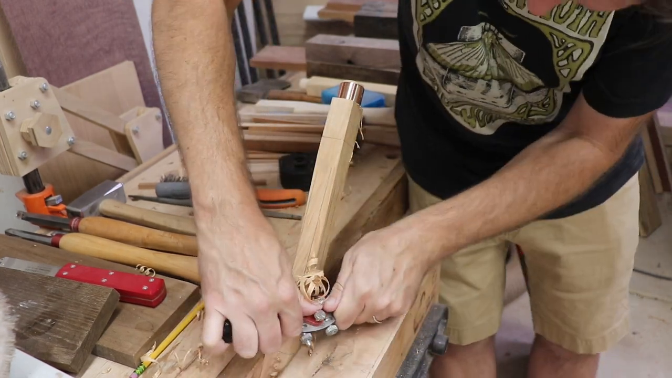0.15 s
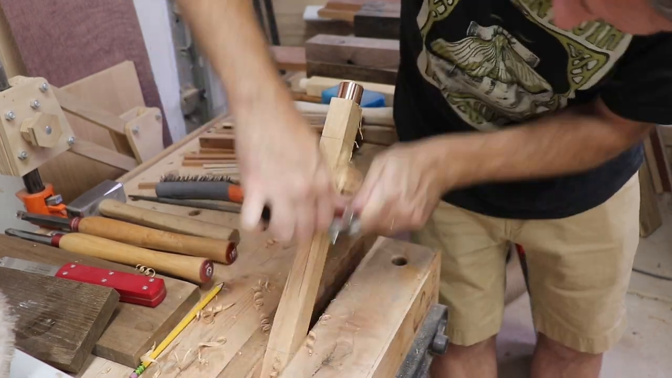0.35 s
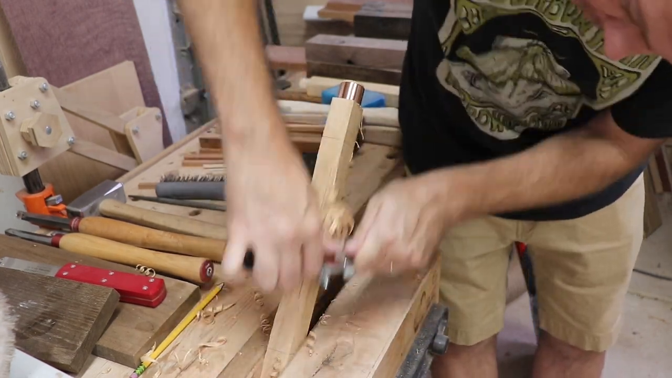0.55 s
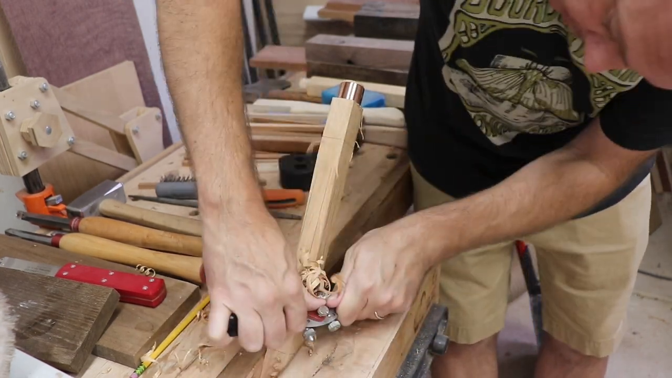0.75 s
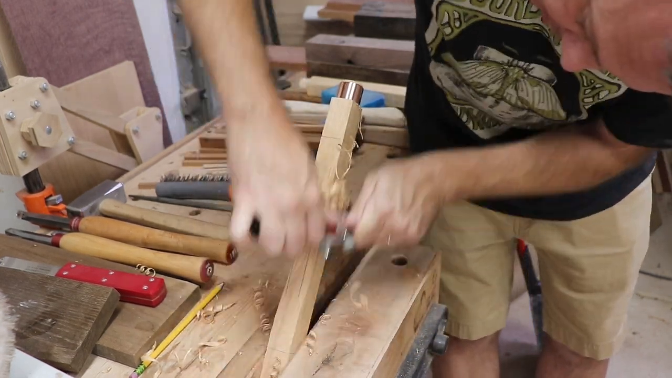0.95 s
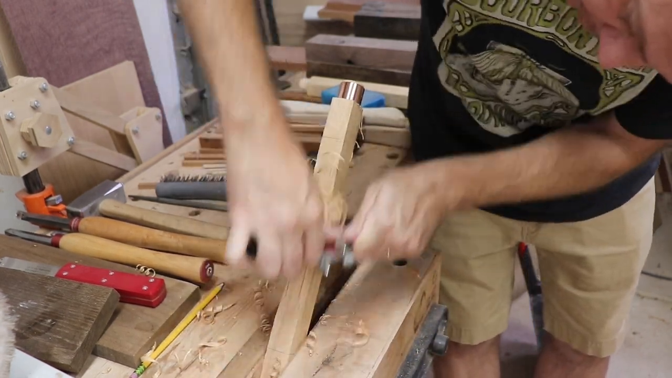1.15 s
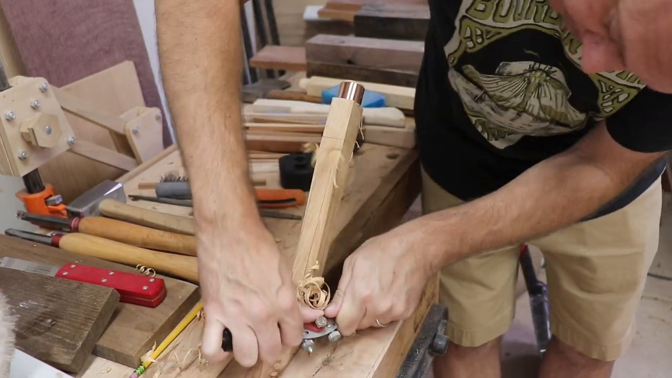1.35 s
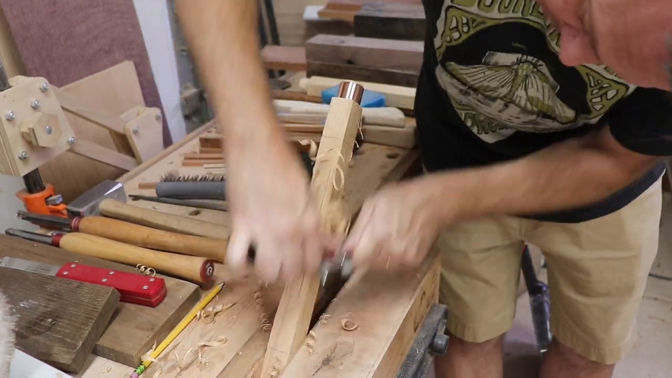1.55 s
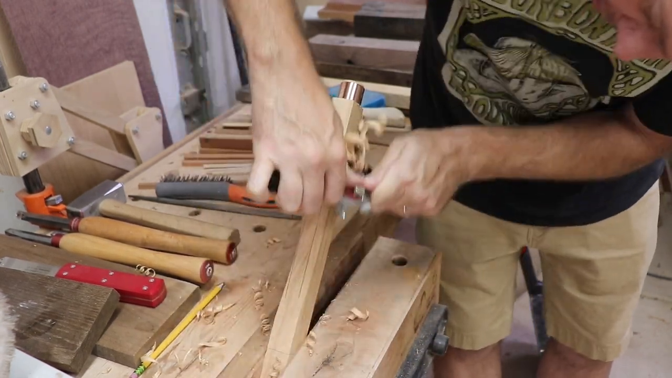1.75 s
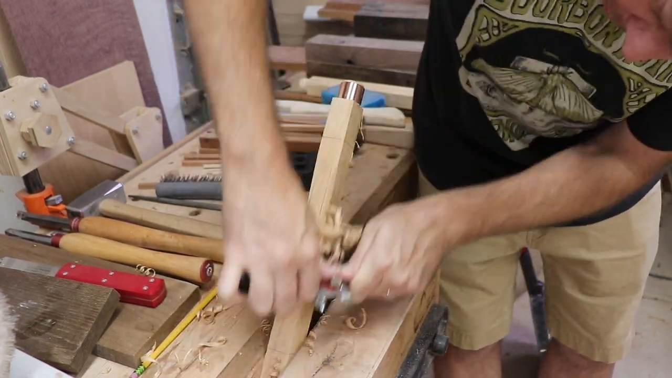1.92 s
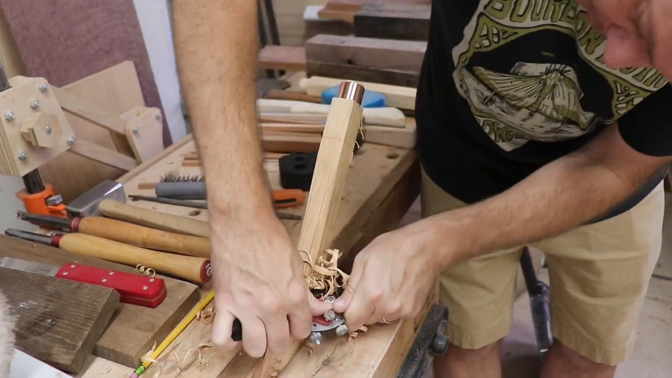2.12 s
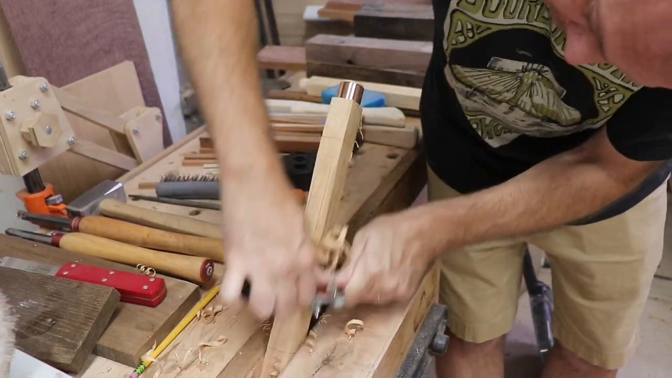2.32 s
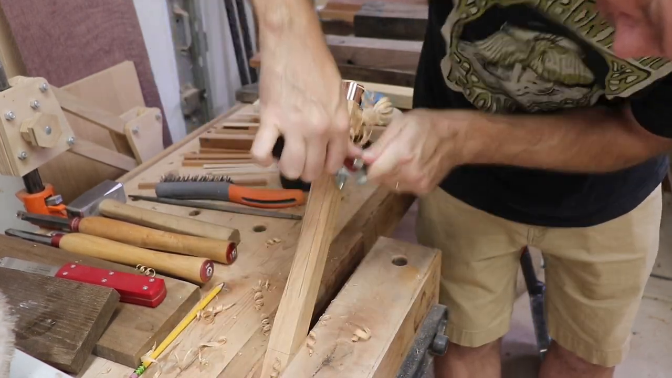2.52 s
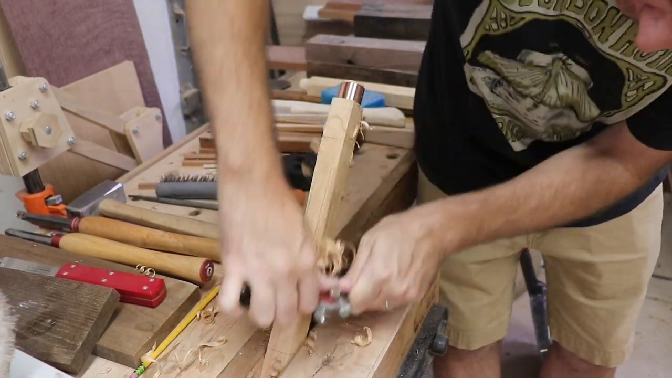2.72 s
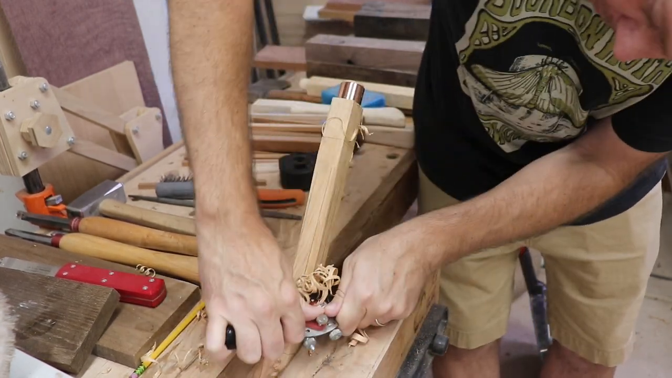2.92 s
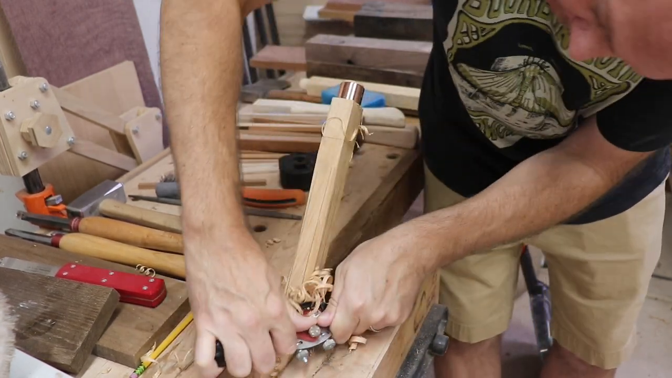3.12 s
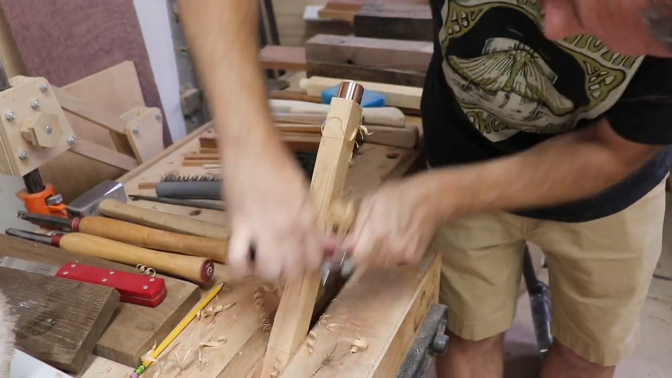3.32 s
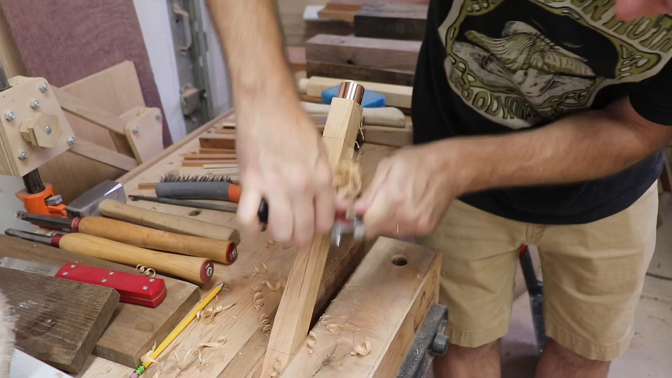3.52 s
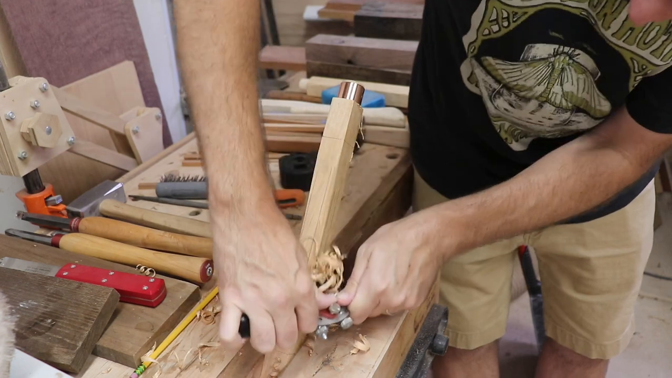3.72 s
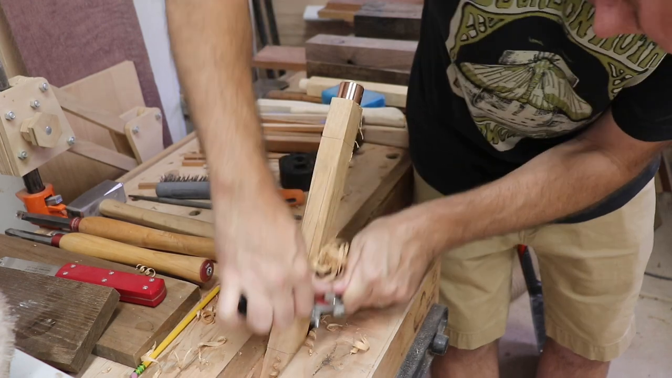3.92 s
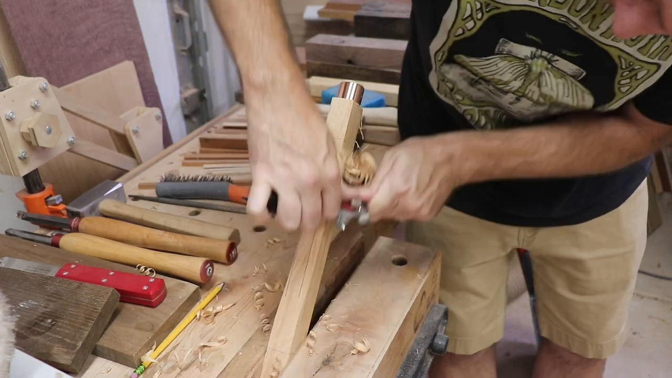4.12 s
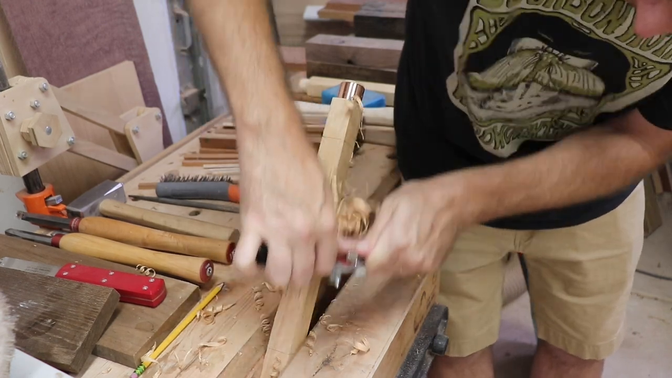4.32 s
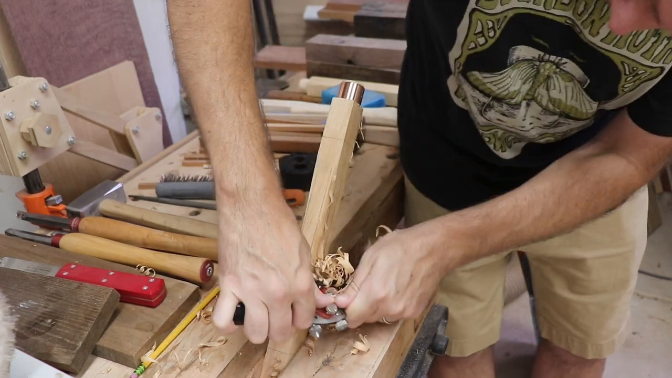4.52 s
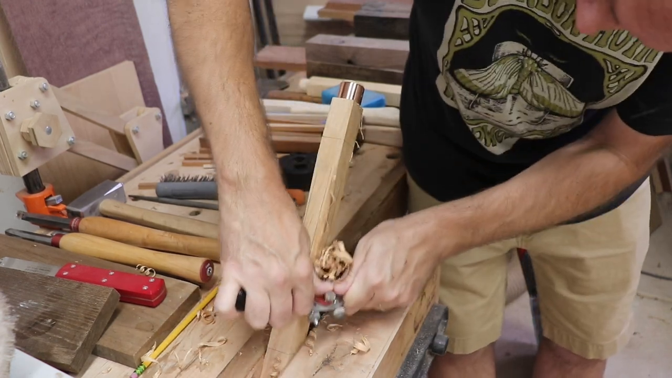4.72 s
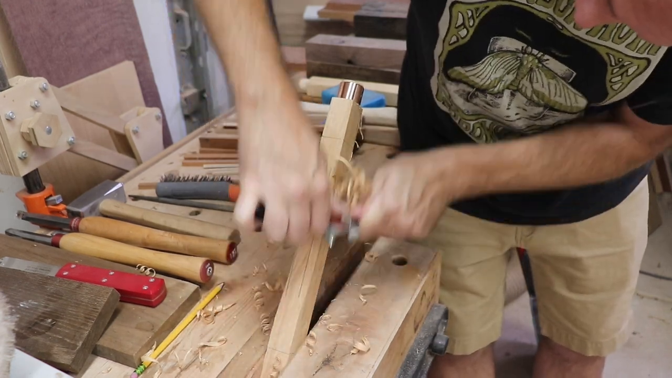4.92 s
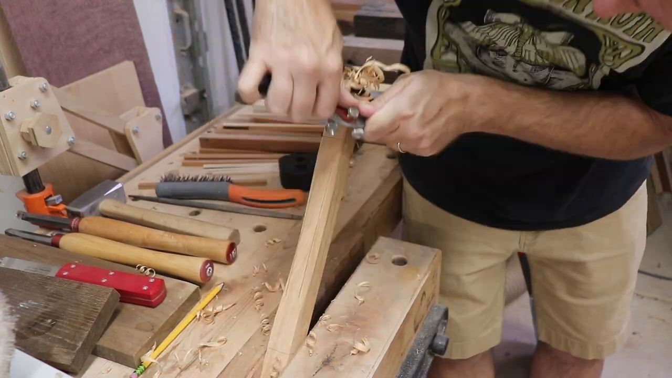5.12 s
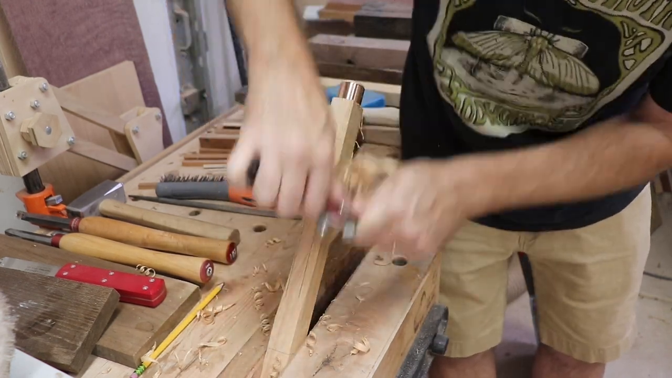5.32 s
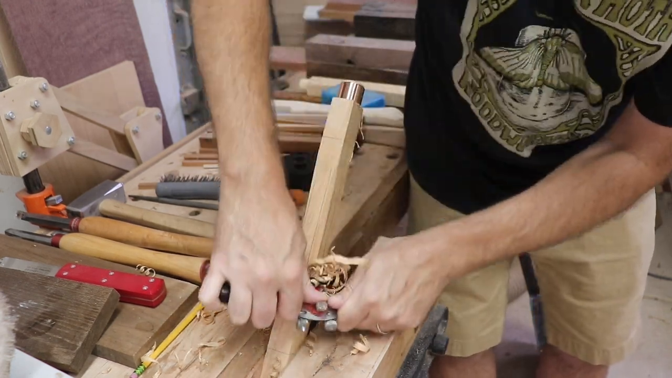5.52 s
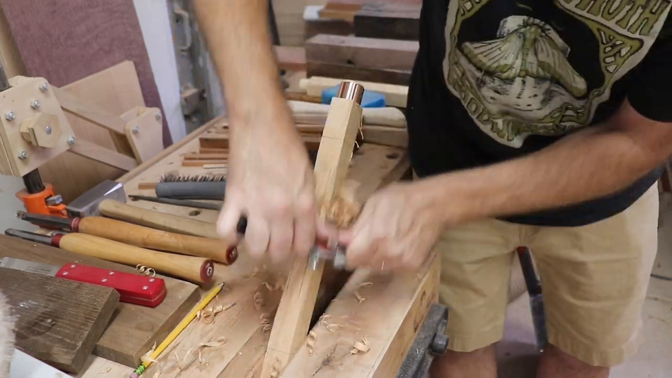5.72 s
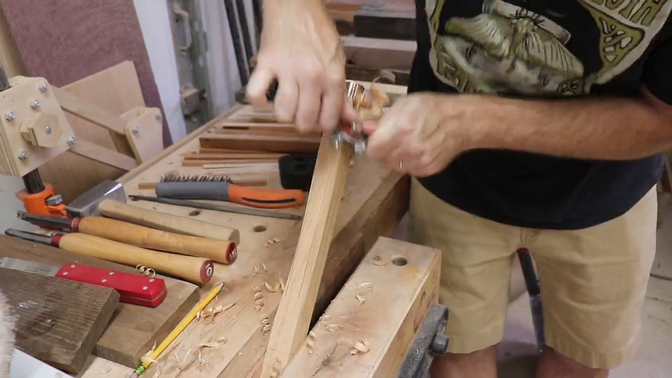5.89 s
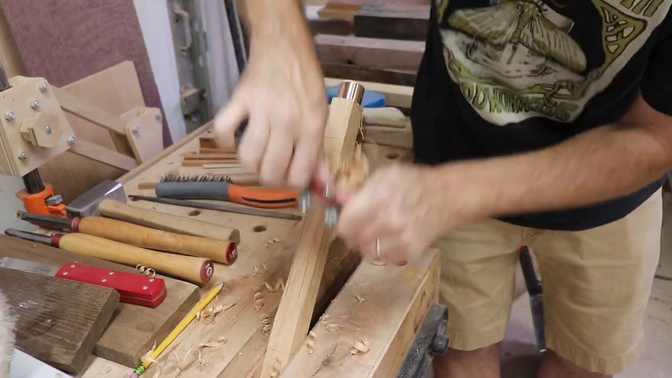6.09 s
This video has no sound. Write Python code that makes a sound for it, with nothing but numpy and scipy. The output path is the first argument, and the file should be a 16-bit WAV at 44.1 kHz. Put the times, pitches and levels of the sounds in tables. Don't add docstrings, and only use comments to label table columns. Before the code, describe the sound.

Repeated dry, hissing scrapes of a hand blade shaving wood, each return ending in a hollow knock and metallic rattle in a small workshop.

```python
import sys
import numpy as np
from scipy import signal
from scipy.fft import rfft, irfft, next_fast_len
from scipy.io import wavfile
from scipy.ndimage import uniform_filter1d, map_coordinates

SR = 44100
rng = np.random.default_rng(int(sys.argv[2]) if len(sys.argv) > 2 else 0)


def gain_from_db(level_db):
    decades = np.asarray(level_db, float) / 20
    return 10 ** decades


def inscribe(sig):
    pcm = np.round(np.clip(np.atleast_2d(sig).T, -1, 1) * 32767)
    wavfile.write(sys.argv[1], SR, pcm.astype(np.int16))


N = 271215
CONTROL_S = np.arange(0, N, 44) / SR

KNOCKS = [
    (.0320, -4, -13, -0.5, -6),
    (0.762, -3, -16, 0.5, -12.5),
    (1.3796, -7.5, -26, 2.5, -7),
    (2.1526, -8, -19, -3, -12.5),
    (2.9212, -35.5, 5, 11.5, -2),
    (3.2170, -37, 8, -7, 1),
    (3.8762, -1.5, -23, -10.5, -11.5),
    (4.6443, -0.2, -22, -7, 1),
    (5.6288, -18.5, 4, 11.5, -11),
]


def unit(x):
    return x / np.sqrt(np.mean(x ** 2) + 1e-20)


def along(points, hz):
    f, v = np.transpose(points)
    return np.interp(np.log(hz + 1), np.log(f + 1), v)


def wobble(rate):
    knots = rng.standard_normal(int(N * rate / SR) + 4)
    return map_coordinates(knots, [np.arange(N) * rate / SR])


def filtered(x, response):
    m = next_fast_len(N + SR // 2)
    return irfft(rfft(x, m) * response(np.fft.rfftfreq(m, 1 / SR)), m)[:N]


def rung(x, modes, turn=-1):
    out = 0
    for k, (hz, width, db) in enumerate(modes):
        out = out + turn ** k * gain_from_db(db) * signal.lfilter(*signal.iirpeak(hz, hz / width, SR), x)
    return out


def streaked(x, modes, streak_db, rate=14, near_hz=None, spread=None):
    out = np.zeros(N)
    for k, mode in enumerate(modes):
        off_db = 0 if near_hz is None else -spread * np.log2(mode[0] / near_hz) ** 2
        out += (-1) ** k * gain_from_db(streak_db * wobble(rate) + off_db) * rung(x, [mode])
    running_power = np.abs(uniform_filter1d(out ** 2, SR // 8))
    return out / np.sqrt(running_power + 1e-12)


def tearing(spike_db, lump_db):
    return rng.standard_normal(N) * gain_from_db(spike_db * wobble(1200) + lump_db * wobble(70))


def strokes():
    # centre in Hz, width in Hz, level in dB.
    rubbed = [(680, 52, 2), (822, 78, -1.5), (1040, 79, -8), (1172, 68, -5), (1320, 65, -4.5),
              (1490, 70, -5), (1700, 180, -13.5)]
    rubbed_hard = [(1960, 330, 1), (2385, 71, 2.5), (2620, 160, -1.5)]
    vise = [(257.6, 45.3, -4.5), (318.8, 55.4, -7), (399.4, 50.3, 2.5), (536.4, 118.2, -5.5)]
    bench = [(134, 45, 0)]
    blade = [(2830, 210, -5.5), (3520, 160, 1.5), (4090, 170, -4.5), (5060, 230, -0.5), (5570, 170, 3.5),
             (6290, 240, -2.5)]
    dry_curls = [(2300, 380, -0.5), (3200, 610, 2), (4240, 2100, 1), (5240, 860, 3), (6100, 1700, -5),
                 (7300, 2200, -10)]
    shaving = [(7470, 3500, -8), (9550, 830, -1), (10300, 950, -6), (11070, 340, 2), (12270, 2200, -5.5),
               (14200, 670, -3), (14860, 590, -4.5)]
    controls = [np.interp(np.arange(N) / SR, CONTROL_S, curve) for curve in drive()]
    wood_db, vise_db, blade_db, hiss_db, place_hz, focus, hard_db, back_db = controls
    idle = np.clip(0.84 * gain_from_db(2 * (back_db - blade_db)), .12, .95)
    chatter = gain_from_db(1.24 * wobble(35))

    wood = tearing(spike_db=1.5, lump_db=0.0)
    wood = streaked(wood, rubbed, streak_db=3.0, rate=25, near_hz=place_hz, spread=focus)
    wood = unit(rung(wood, [(1250, 4000, 0)]))
    hard_grain = streaked(tearing(spike_db=4.0, lump_db=-1.0), rubbed_hard, streak_db=2.0)
    wood += gain_from_db(hard_db - 8.5) * hard_grain
    clamped = streaked(tearing(spike_db=1, lump_db=4.0), vise, streak_db=5.0)
    boom = unit(rung(tearing(spike_db=6.5, lump_db=2.5), bench))
    steel = rung(tearing(spike_db=2.5, lump_db=0.5), [(4700, 6300, 0)])
    steel = streaked(steel, blade, streak_db=4.5, rate=30)
    curls = streaked(tearing(spike_db=4.5, lump_db=0.0), dry_curls, streak_db=4, rate=120)
    hiss = rung(tearing(spike_db=3.0, lump_db=1.0), [(11300, 12000, 0)])
    hiss = streaked(hiss, shaving, streak_db=1.5, rate=48)

    cut = gain_from_db(wood_db) * wood + gain_from_db(vise_db) * clamped
    cut += gain_from_db(0.45 * wood_db - 40.5) * boom
    cut += gain_from_db(blade_db) * (np.sqrt(1 - idle) * steel + np.sqrt(idle) * curls)
    cut += gain_from_db(hiss_db) * hiss
    return chatter * cut


def drive():
    # edge touches, full bite and lift in seconds, wood level in dB, drift while biting in dB.
    pulls = [
        (0.199, 0.318, 0.41, -30, -1),
        (0.851, 0.918, 1.028, -29, -2),
        (1.473, 1.602, 1.689, -26.5, -2.5),
        (2.253, 2.37, 2.488, -29, -7),
        (3.211, 3.354, 3.417, -31, 0),
        (3.915, 4.031, 4.149, -26.5, -3.5),
        (4.678, 4.955, 5.027, -30.5, -1),
        (5.758, 5.773, 5.892, -29.5, -4.5),
    ]
    # blade, shaving hiss and vise against the wood in dB,
    # pitch of the wood in Hz, pitch after the lift in Hz.
    voices = [(-7.5, -12, -14.5, 1200, 2400), (-7.5, -12.5, -16, 1320, 3700), (-7, -8.5, -13, 1310, 1400),
              (-8, -8.5, -11, 1340, 320), (-1, -5.5, -18.5, 1420, 1330), (-9, -9, -12, 1210, 1200),
              (-6, -7.5, -8.5, 1400, 1200), (-5.5, -8, -13.5, 1290, 850)]
    # focus on the pitch in dB per squared octave, hard grain in dB,
    # fall after the lift in dB/s, slide after it in dB.
    endings = [(30, 0.5, 320, -26), (36, -2.5, 315, -47), (20, 0.1, 316, -25), (22, 0, 348, -27),
               (20, 3.5, 303, -22), (14.7, -1.5, 297, -29), (12, 0.5, 322, -19), (34, 0, 333, -23.5)]
    # time in seconds, wood level in dB, vise level in dB.
    snags = [
        (.40, -61.5, -39.5),
        (3.274, -29.5, -36.5),
        (5.775, -31, -60),
        (5.989, -44.5, -42),
    ]
    # start, busiest and end in seconds, rustle in dB, hiss against it in dB.
    returns = [
        (-.02, 0, 0.019, -51, -9),
        (0.46, .57, 1.08, -51, -3),
        (1.115, 1.19, 1.358, -44.5, -3.5),
        (1.96, 2.094, 2.13, -55.5, -2),
        (2.63, 2.704, 2.84, -58.5, -8),
        (3.03, 3.171, 3.46, -53.5, -3),
        (4.22, 4.294, 4.47, -45.5, -3.5),
        (5.15, 5.204, 5.33, -65.5, -17),
        (5.553, 5.591, 5.96, -53, -4),
        (5.68, 5.763, 5.77, -43, -1),
    ]
    rise_db, brush_db = 30.5, -10.5
    rest_db = -72.5

    touch, full, lift, db, drift_db = np.transpose(pulls)[..., None]
    blade_db, hiss_db, vise_db, hz, after_hz = np.transpose(voices)[..., None]
    focus, hard_db, fall_db_per_s, slide_db = np.transpose(endings)[..., None]
    edge_db, gone = swell(touch, full, lift, rise_db, 1.65, fall_db_per_s)
    linger_db = db + slide_db + swell(full, lift, lift, rise_db, 1, 71.5)[0]
    steel_db = db + np.where(gone < 1, 0.93, 1) * edge_db + 1.4 * drift_db * gone
    load_db = db + vise_db + .6 * edge_db - 9.5 * np.sin(np.pi * gone) ** 2

    snag_s, snag_db, jolt_db = np.transpose(snags)[..., None]
    jerk_db = swell(snag_s - .018, snag_s, snag_s, 16, 0.91, 450)[0]

    start, busiest, end, back_db, air_db = np.transpose(returns)[..., None]
    rustle_db, past = swell(start, busiest, end, 15, 0.97, 259.5)
    rustle_db = back_db + rustle_db - 5 * past

    s, ring_db = np.transpose(KNOCKS)[:2, :, None]
    settle_db = -37 + 0.46 * ring_db + swell(s, s, s, rise_db, 1, 125)[0]
    settle_steel_db = settle_db - 18

    pitch_s = np.hstack([touch, full, lift, lift + .1]).ravel()
    pitch_hz = np.hstack([.92 * hz, hz, hz, after_hz]).ravel()
    wood = together(db + edge_db + drift_db * gone, linger_db, snag_db + jerk_db, settle_db,
                    rustle_db + brush_db, rest_db)
    vise = together(load_db, jolt_db + jerk_db, settle_db - 1.0, rustle_db + brush_db - 6, rest_db + 4.0)
    blade = together(steel_db + blade_db, settle_steel_db, rustle_db, rest_db - 7.5)
    hiss = together(steel_db + hiss_db, settle_steel_db - 4.0, rustle_db + air_db, rest_db - 7.5)
    place_hz = np.interp(CONTROL_S, pitch_s, pitch_hz)
    focus, hard_db = (np.interp(CONTROL_S, full.ravel(), v.ravel()) for v in (focus, hard_db))
    return wood, vise, blade, hiss, place_hz, focus, hard_db, together(rustle_db, rest_db - 9.5)


def swell(start, full, end, rise_db, bend, fall_db_per_s):
    t = CONTROL_S
    to_go = np.clip((full - t) / np.maximum(full - start, 1e-3), 0, None)
    shape_db = -rise_db * to_go ** bend - fall_db_per_s * np.clip(t - end, 0, None)
    gone = np.clip((t - full) / np.maximum(end - full, 1e-3), 0, 1)
    return np.maximum(shape_db, -150), gone


def together(*levels_db):
    return 10 * np.log10(sum(np.sum(np.atleast_2d(gain_from_db(2 * db)), axis=0) for db in levels_db))


def knocks():
    heels = [
        (0.037, -11.5, 0, -9.5, -30),
        (.7740, -18, -6.5, 3, -1),
        (1.3869, -10, -11.5, -11, -33.5),
        (3.8829, -10, -10.5, 9, -27),
        (4.6478, -4, -1, 0.5, -31),
    ]
    toe_thin_db = [-13.5, -4, -8, -10, 2, 2, -9, -5.5, -10]
    # centre in Hz, width in Hz, level in dB.
    thud = [(263, 19, -4.5), (421, 14, 5.5), (605, 80, -8.5)]
    dull = [(730, 70, -15), (839.5, 47, 5)]
    handle = [(930, 90, -11.5), (981, 39, 9.5), (1160, 330, -10)]
    thin = [(2041, 33, -4.5), (2077, 35, 2)]
    hard = [(1540, 74, -5), (1830, 160, -9.5), (2454, 99, 2.5), (2550, 350, -5.5), (3480, 180, -7.5)]
    sole = [(2040, 2200, 1)]
    s, ring_db, thud_db, dull_db, hard_db = np.transpose(KNOCKS + heels)
    thin_db = np.array(toe_thin_db + [-31] * len(heels))

    def push(db):
        return np.bincount(np.round(s * SR).astype(int), gain_from_db(ring_db + db), N)

    low = rung(push(29), handle, turn=0.83)
    low += rung(push(thud_db + 36.5), thud, turn=0.83)
    low += rung(push(dull_db + 29.5), dull, turn=0.83)
    high = rung(push(thin_db + 33.0), thin) + rung(push(hard_db + 30), hard, turn=0.68)
    blunt = signal.sosfilt(signal.butter(4, 1250, fs=SR, output="sos"), low)
    return near(blunt + rung(rung(high, sole), sole))


def near(x):
    walls = [(.0031, -13), (.0072, -13.5), (.0118, -21), (.0175, -19.5), (.0246, -21.5)]
    out = x
    for k, (s, db) in enumerate(walls):
        out = out + (-1) ** k * gain_from_db(db) * np.pad(x, (round(s * SR), 0))[:N]
    return out


def ticks():
    # start in seconds, peak in dB above 8 kHz, lower steel ring against it in dB.
    rattles = [(0.033, -33.5, 0), (0.0376, -19.5, -4), (0.7642, -23, 5), (0.7735, -11.5, -13),
               (0.785, -27.5, -29), (1.38, -20.5, -0.5), (1.3854, -21, -10.5), (2.1531, -26.5, -1),
               (2.1575, -24.5, -23), (2.208, -43, -1.5), (2.2493, -42, -2.5), (2.9215, -28.5, -5),
               (3.2173, -37, 13.5), (3.2334, -31, -19), (3.2426, -26, -18.5), (3.247, -34.5, -11.5),
               (3.876, -19, -12), (3.8822, -8.5, -13), (4.6453, -35.5, 7.5), (4.6482, -20.5, -4),
               (4.6524, -16.5, -6), (5.6288, -26, -2.5), (5.6326, -19.5, -15)]
    snaps = [(0.5851, -40.5, -1.5), (0.74, -34, -0.5), (1.1508, -46.5, 12), (1.1688, -46.5, 15),
             (1.1927, -29.5, -4.5), (1.3136, -32.5, -20), (1.3238, -26.5, -7), (2.0418, -49.5, -8),
             (2.0791, -33.5, -6.5), (2.2827, -43.5, -6.5), (2.3491, -24, -10), (3.1505, -52, -10),
             (3.166, -46, -9.5), (3.173, -44, -3), (3.2853, -30.5, -19), (3.3872, -17, -23.5),
             (4.2577, -39, 4.5), (4.293, -32.5, 6.5), (4.344, -35, 0.5), (4.5266, -45.5, -14.5),
             (5.176, -53.5, 10), (5.25, -64, 7), (5.2994, -64, -4), (5.7493, -34, 4), (5.7736, -25, 2.5),
             (5.8717, -17.5, -20), (5.97, -48.5, 4)]
    # centre in Hz, width in Hz, level in dB.
    screw_low = [(3620, 230, 4), (4760, 210, 1.5), (5500, 710, 1.5), (6500, 1500, -10), (7620, 180, -4)]
    screw_high = [(9850, 140, -3), (10250, 650, -4), (12000, 280, -11.5), (11700, 5800, -6.5),
                  (12400, 1200, -1), (14420, 2200, -22.5)]
    s, peak_db, low_db = np.transpose(sorted(rattles + snaps))
    bright = rung(bursts(s, peak_db + .1, 0.015, screw_high), [(11600, 11000, 0.0037)])
    return bright + bursts(s, peak_db + low_db + .1, 0.023, screw_low)


def bursts(times, levels_db, t60, modes):
    out = np.zeros(N + SR)
    t = np.arange(SR // 20) / SR
    for s, db in zip(times, levels_db):
        strengths = rng.standard_normal(len(modes))
        struck = [(hz, width, level + 4 * r) for (hz, width, level), r in zip(modes, strengths)]
        contact = gain_from_db(-60 * t / t60) * (1 - np.exp(-t / 0.00013)) * rng.standard_normal(len(t))
        ring = rung(contact, struck)
        out[round(s * SR):][:len(t)] += gain_from_db(db) * ring / np.abs(ring).max()
    return out[:N]


def shop(x):
    decay = [(200, 0.51), (1000, 0.36), (4000, 0.36), (12000, 0.1)]
    out = np.zeros(N + 2 * SR)
    step = SR // 4
    for start in range(0, N, step):
        hz, t, z = signal.stft(rng.standard_normal(SR // 2), SR, nperseg=256)
        fading = z * gain_from_db(-60 * t / along(decay, hz)[:, None])
        tail = signal.istft(fading, SR, nperseg=256)[1]
        wet = signal.fftconvolve(x[start:start + step], tail / np.linalg.norm(tail))
        out[start + 300:][:len(wet)] += wet
    return out[:N]


def background():
    air = [(15, -43.5), (25, -8.5), (76, -15.5), (108, -6), (317, -18.5), (405, -18.5), (531, -23.5),
           (624, -20.5), (1260, -20), (2220, -26), (4140, -28), (6210, -30.5), (16000, -33)]
    turn = 2 * np.pi * 60 * np.arange(N) / SR + 0.4 * wobble(22)
    hum = gain_from_db(-52.5 + 2.2 * wobble(26)) * np.sin(turn)
    noise = filtered(rng.standard_normal(N), lambda hz: gain_from_db(along(air, hz)))
    return hum + gain_from_db(-60.0) * unit(noise)


def scene():
    hits = knocks() + ticks()
    cut = strokes()
    room = shop(gain_from_db(-13.0) * hits + gain_from_db(-11) * cut)
    return (hits + gain_from_db(-1) * cut + room + background())[None]


def low_pass(x):
    return signal.sosfilt(signal.butter(12, 16480, fs=SR, output="sos"), x)


def record(dry):
    rolled = filtered(dry[0], lambda hz: 1 / np.sqrt(1 + (hz / 15500) ** 60))
    return low_pass(np.clip(rolled, -1, 1)[None])


dry = scene()
out = record(dry)
inscribe(out)
```